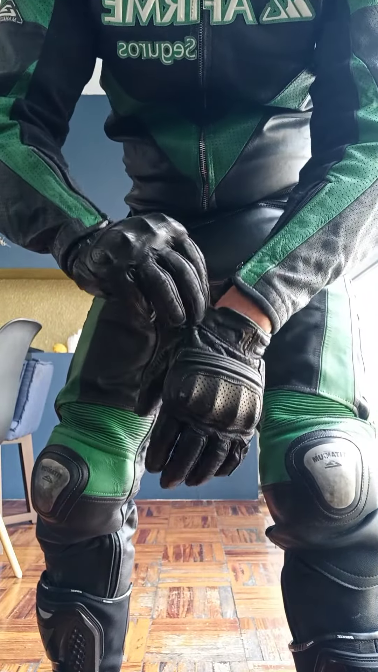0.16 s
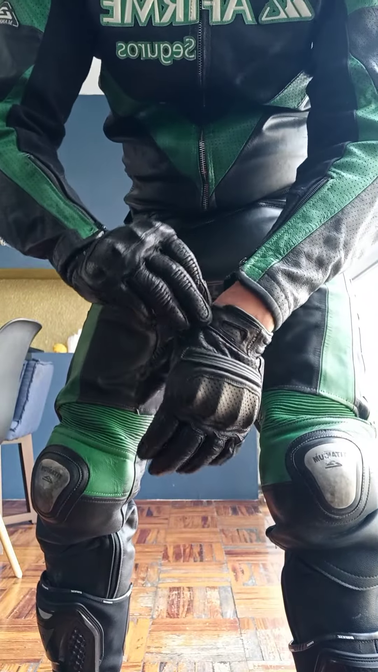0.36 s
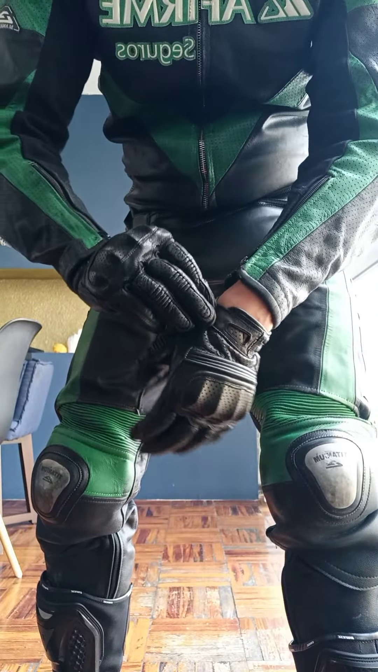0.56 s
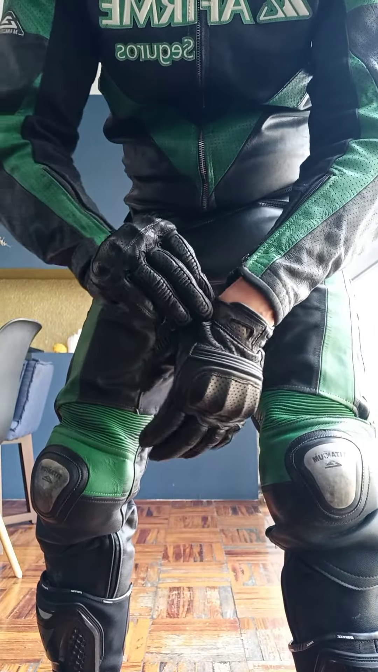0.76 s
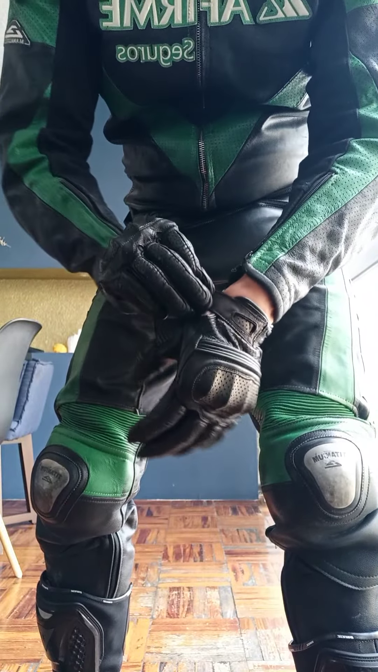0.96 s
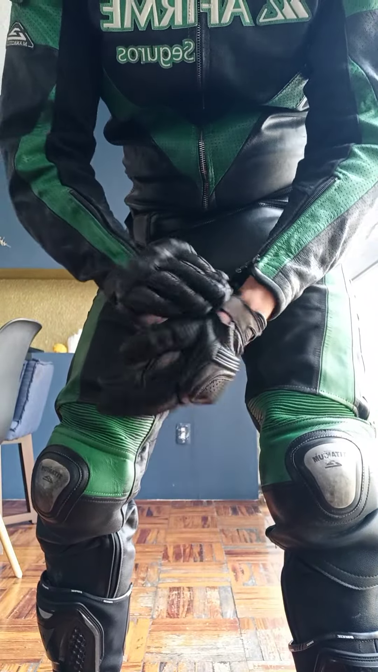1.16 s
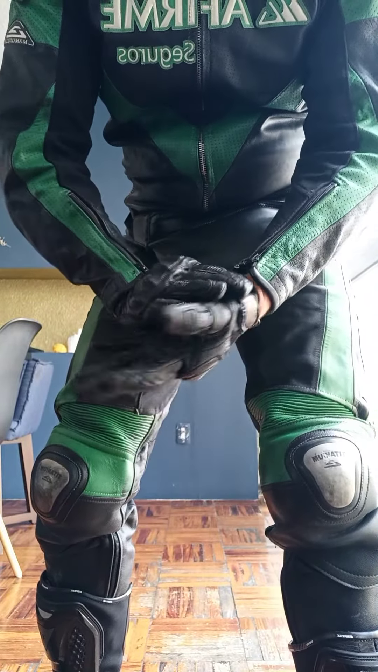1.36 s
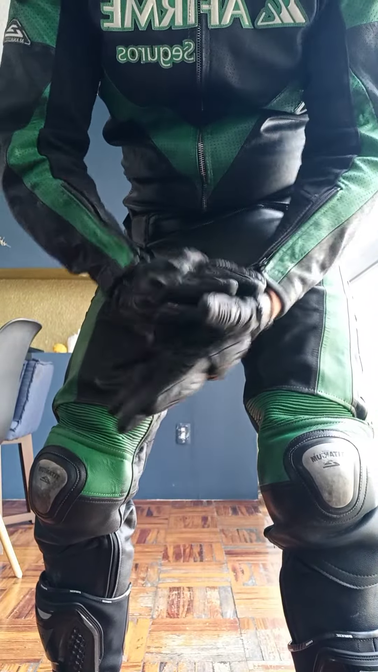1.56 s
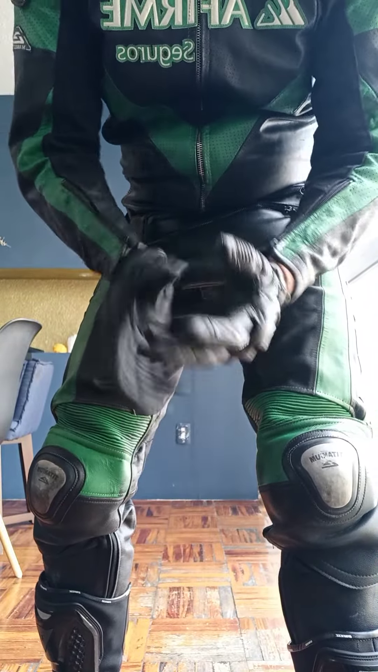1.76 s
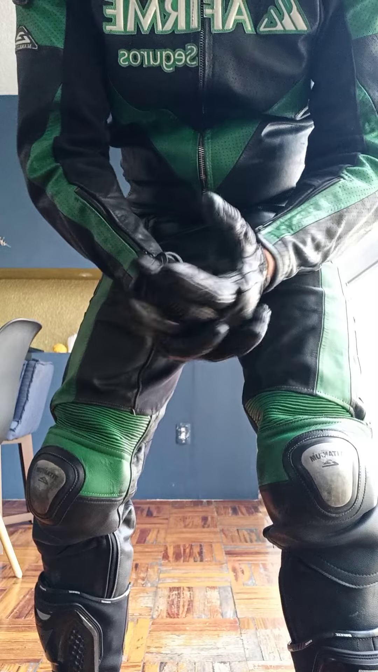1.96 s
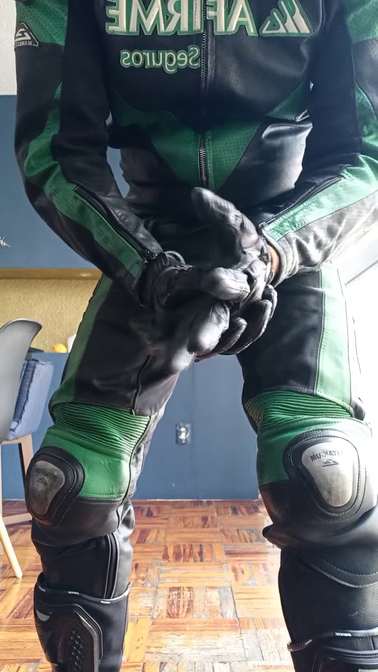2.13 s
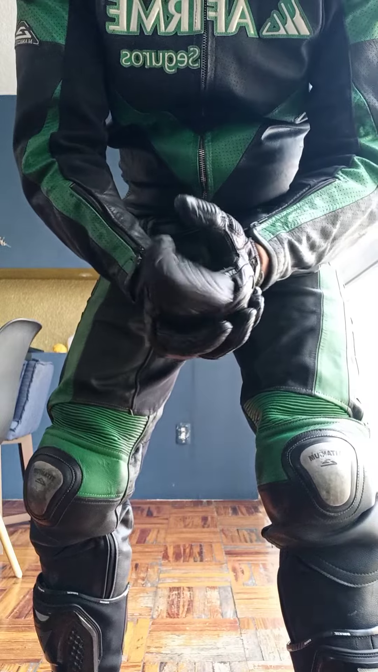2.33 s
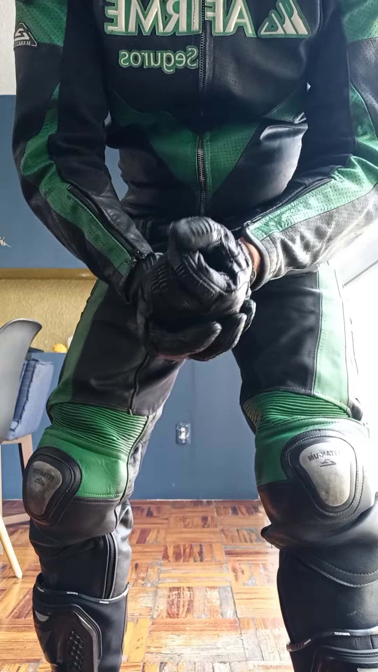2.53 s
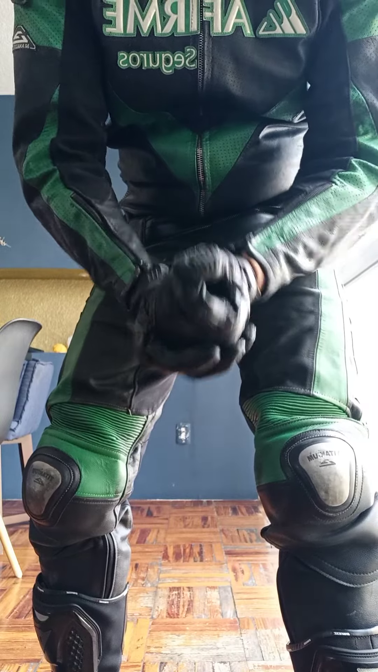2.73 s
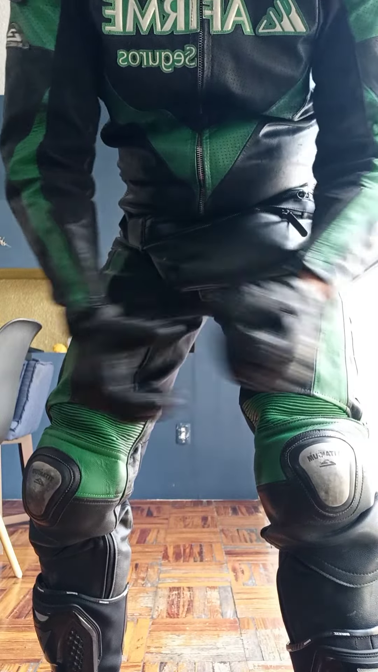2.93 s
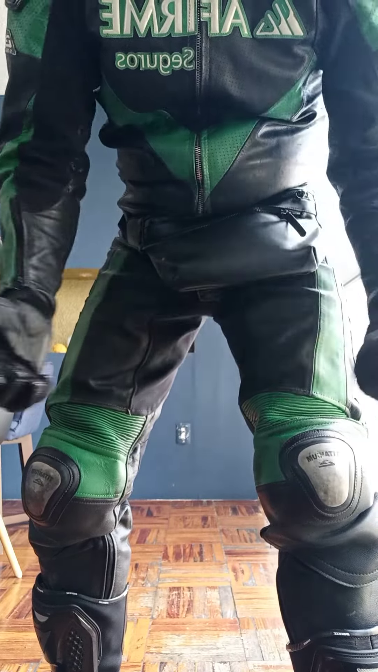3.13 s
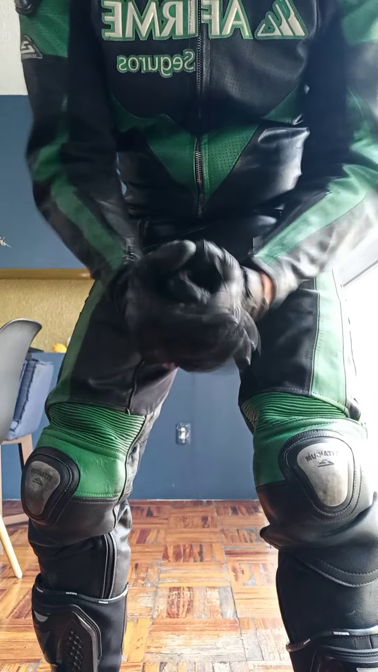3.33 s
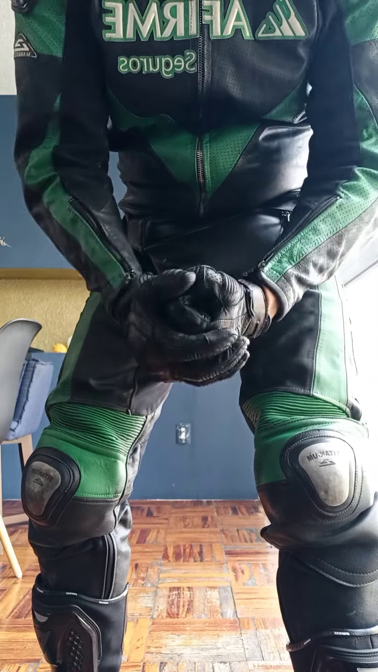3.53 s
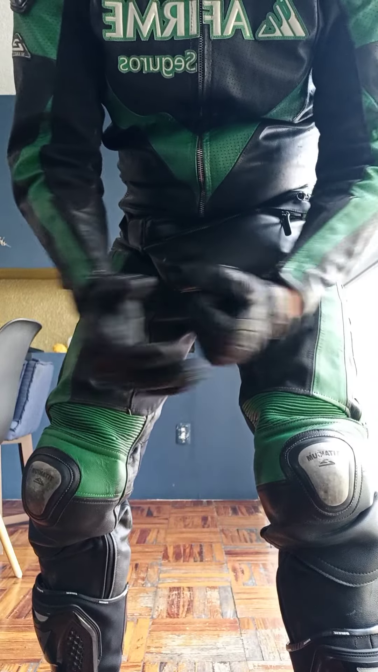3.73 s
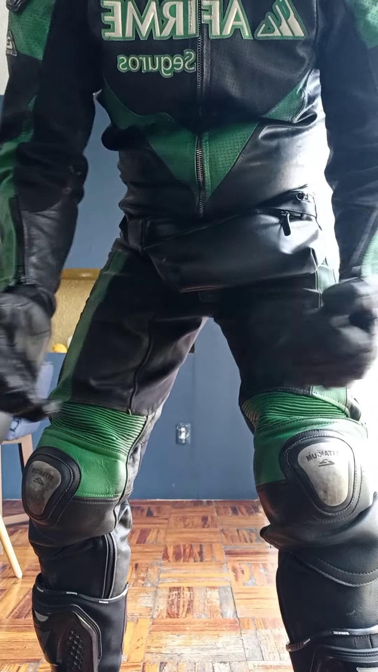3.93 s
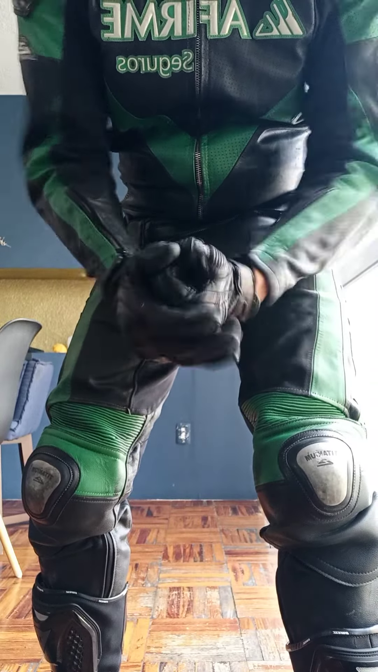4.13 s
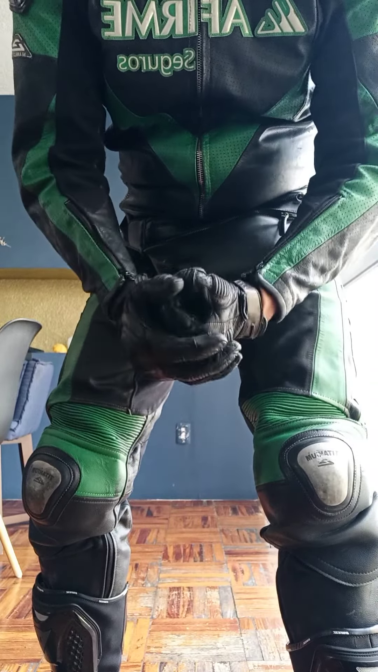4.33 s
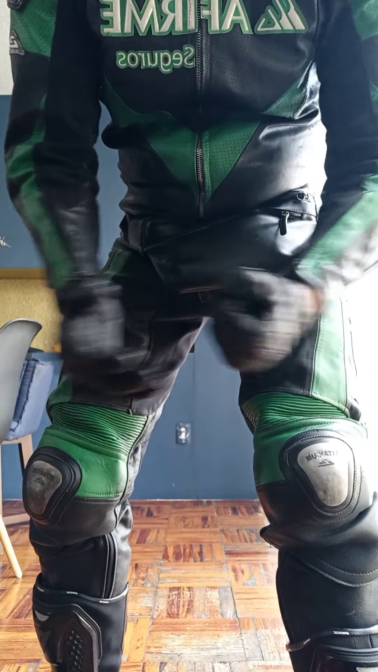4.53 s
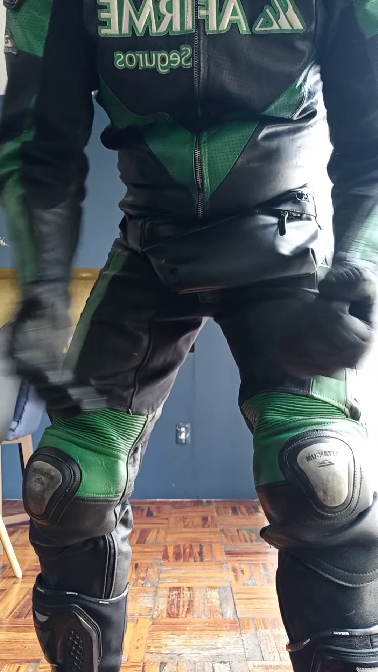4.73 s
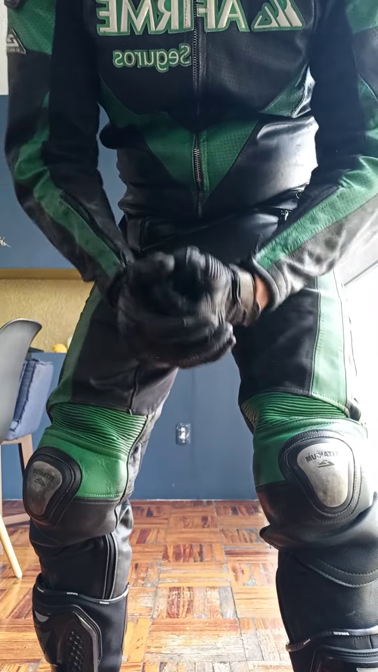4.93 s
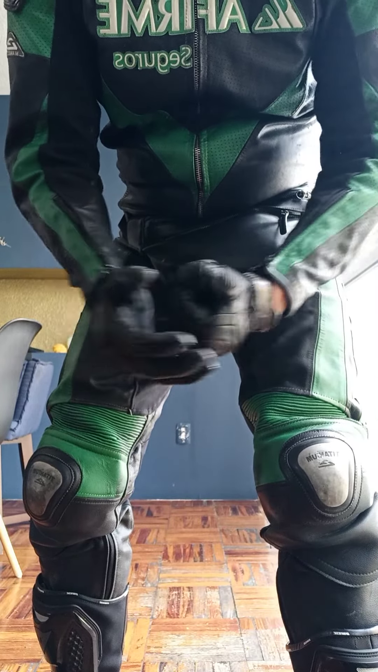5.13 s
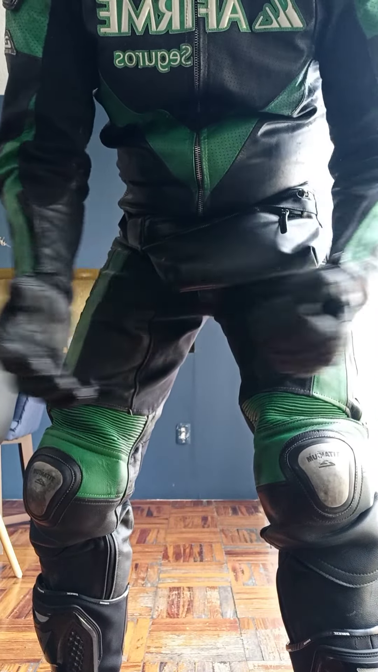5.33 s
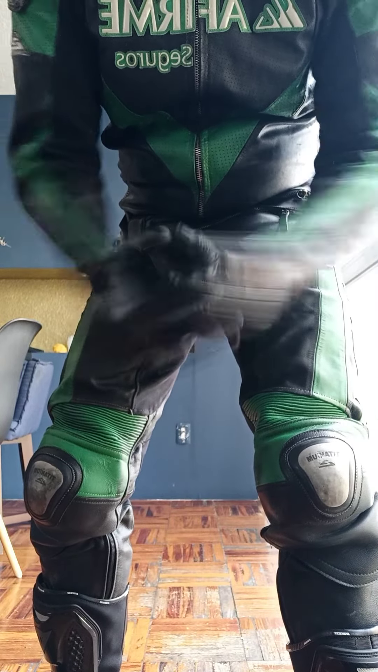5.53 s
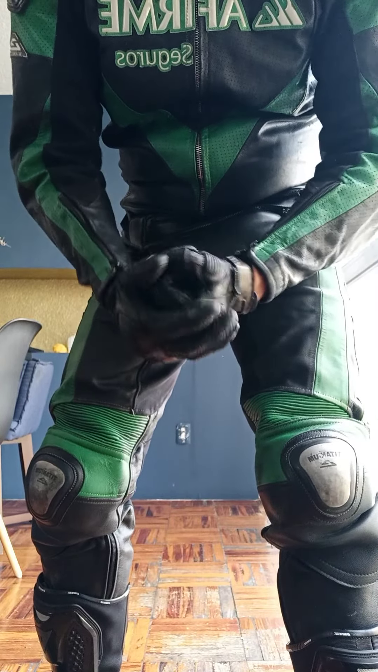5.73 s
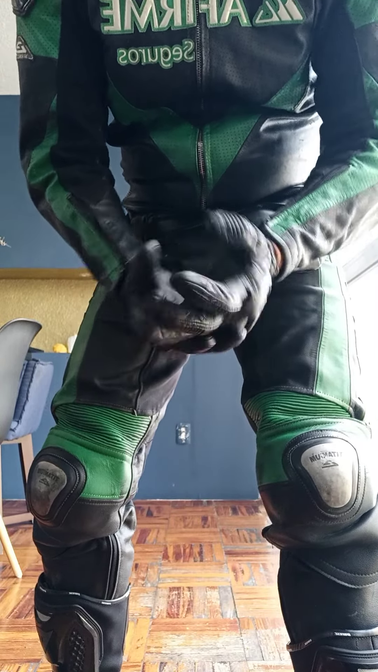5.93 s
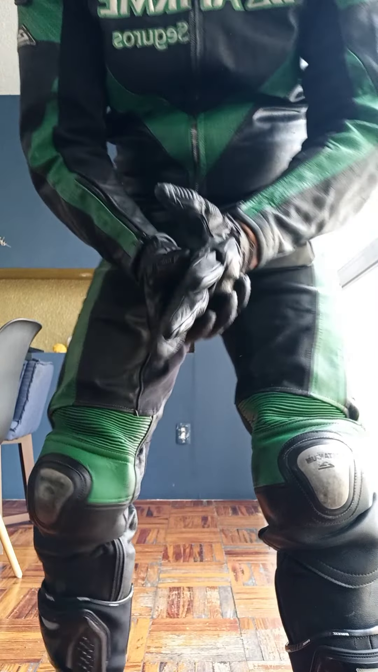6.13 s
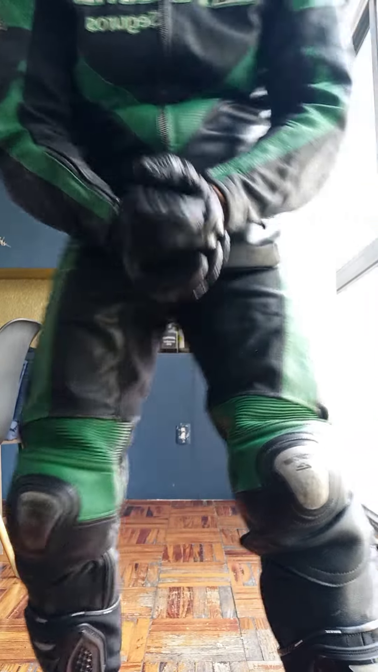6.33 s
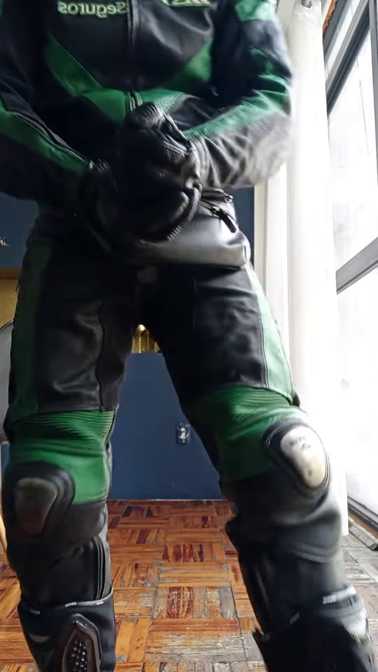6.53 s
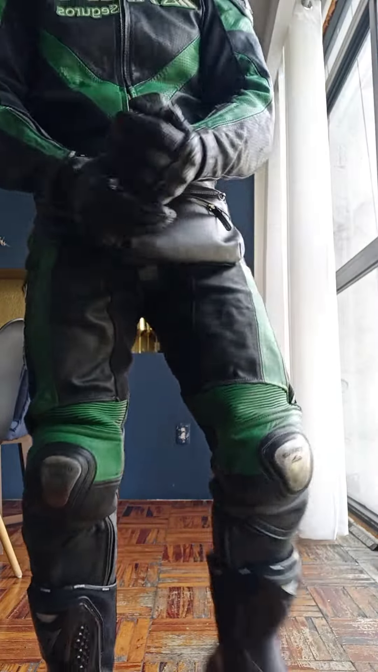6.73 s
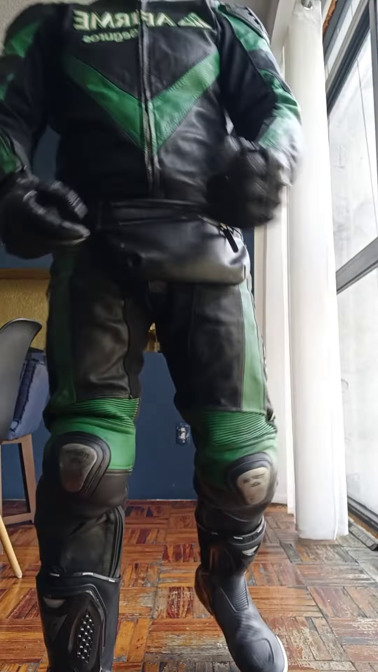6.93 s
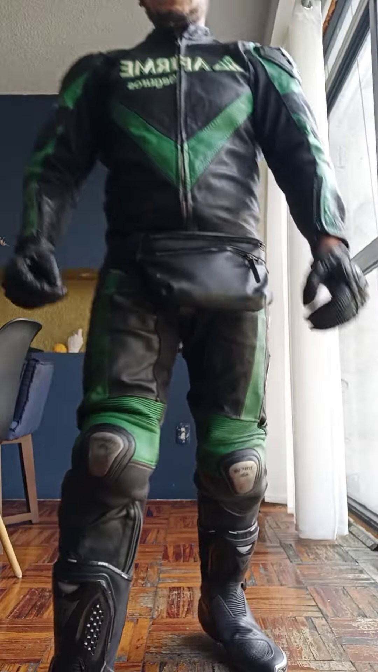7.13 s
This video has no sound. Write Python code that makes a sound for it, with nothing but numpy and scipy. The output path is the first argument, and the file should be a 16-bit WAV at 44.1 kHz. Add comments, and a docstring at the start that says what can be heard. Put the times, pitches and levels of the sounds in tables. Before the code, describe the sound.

Gloves creak and snap in small clicks, a fist slaps a gloved palm four evenly spaced times with short room echo, then heavy leather rustles and creaks.

```python
"""Tight leather creaks, rubs and ticks close by: someone in a riding suit tugs on armoured leather gloves.
Four times a fist smacks the other palm: slap noise and damped resonances, with a bare room ringing after.
Then the wearer straightens up and steps back, heard as creak, rub and a dull flutter of the suit.
Leather is stick-slip noise bursts, folds are decaying noise, the squeak is a ragged tone; soft bumps knock.
Behind lie steady room noise, low swelling tones of distant traffic and a faint wavering hum."""
import sys
import numpy as np
from scipy import signal
from scipy.fft import rfft, irfft, next_fast_len
from scipy.io import wavfile
from scipy.ndimage import uniform_filter1d, minimum_filter1d, map_coordinates

SR = 44100
rng = np.random.default_rng(int(sys.argv[2]) if len(sys.argv) > 2 else 0)


def output_pcm(signal):
    """Save a mono or channel-first signal as 16-bit PCM at the path in sys.argv[1].

    Samples are clipped to [-1, 1] before scaling.
    """
    pcm = np.clip(np.atleast_2d(signal).T, -1, 1) * 32767
    wavfile.write(sys.argv[1], SR, np.round(pcm).astype(np.int16))


N = 321048

# Spectrum levels are relative; squeak, bump, tug and traffic levels set the gain directly.
# Fist into palm, with five resonances of the air pocket and the leather over it:
# (time [s], level [dB], contact [s], room level [dB], boom level [dB], thud [Hz], level [dB],
#  hollow [Hz], level [dB], pop [Hz], level [dB], snap [Hz], level [dB], crack [Hz], level [dB])
PUNCHES = [(3.33, -4, 0.0053, -3, 0, 268, -10.5, 511, 1, 920, 0.5, 1450, -4.5, 2920, 3),
           (4.1104, 2, 0.00371, 1.5, 0.5, 263, -11, 610, -7, 897, -5, 1850, 5, 3430, -3),
           (4.8382, 2.5, 0.00263, 0, -2.5, 309, -2, 587, -16.5, 1185, -12, 1434, 2, 2630, 0.5),
           (5.5664, -4, 0.0045, -2.5, -7.5, 324, -5.5, 593, -5.5, 864, -1.5, 2250, 2.5, 3320, -7.5)]
# Loudest leather folds snapping over: (time [s], crack level [dB], body level [dB])
FOLD_SNAPS = [(0.2267, -21, -62), (0.2749, -23.5, -45), (0.3097, -24, -64), (0.324, -24, -56),
              (0.3352, -19, -49.5), (0.372, -22.5, -55), (0.574, -29.5, -45), (0.65, -33.5, -68),
              (0.6768, -33, -60), (1.0419, -28.5, -66), (1.3147, -32, -43.5), (1.467, -32, -40.5),
              (1.5958, -35, -43.5), (1.6323, -21, -34.5), (1.7695, -24, -37), (1.804, -35, -43.5),
              (1.876, -31, -42.5), (1.885, -30, -44.5), (1.9365, -28.5, -47.5), (2.1043, -30, -54),
              (2.4575, -31.5, -69), (2.8607, -21.5, -33), (2.8831, -24.5, -32), (3.2724, -25, -48),
              (3.4539, -28.5, -55), (6.478, -35, -51)]
# Soft bumps of boots and padding: (time [s], level [dB], pitch [Hz])
BUMPS = [(0.575, -38, 280), (6.268, -41.5, 573.6), (6.299, -34.5, 337), (6.365, -45, 840),
         (6.962, -32, 312), (6.985, -36, 349.6)]
# Tugs dragging tight leather over the hand:
# (start [s], end [s], level at start [dB], level at end [dB], dull scrape level re tug [dB])
TUGS = [(0.208, 0.31, -45.5, -53, -13), (0.309, 0.412, -49, -42, -11), (0.818, 0.838, -61, -64, 5),
        (0.906, 0.948, -49.5, -55, -10), (1.055, 1.09, -38.5, -44.5, -13),
        (1.092, 1.13, -45.5, -39.5, -4.5), (1.536, 1.636, -53, -51, 0), (2.719, 2.894, -51.5, -45.5, -3),
        (5.831, 5.933, -55, -47.5, -6)]
# Leather squeak sliding upward: (time [s], pitch [Hz], level [dB])
SQUEAK = [(6.53, 1800, -68), (6.6, 2200, -63), (6.66, 2600, -62.5), (6.71, 3050, -68), (6.74, 3200, -85)]
# Effort of the fingers working the glove on: (time [s], level [dB])
EFFORT = [(0.0, -61.5), (0.39, -71), (0.64, -68.5), (0.93, -64), (1.13, -55), (1.53, -60), (1.75, -59),
          (2.39, -68), (2.51, -77.5), (2.76, -82), (2.89, -63.5), (3.25, -66.5)]
# Swells of distant traffic: (middle [s], width [s], level [dB], pitch [Hz])
TRAFFIC_SWELLS = [(0.16, 0.07, -53.5, 67.6), (1.83, 0.23, -48, 69.1), (2.421, 0.083, -48, 82),
                  (3.35, 0.27, -42, 84.1), (4.24, 0.099, -41, 84.2), (4.78, 0.11, -43.5, 84.1),
                  (5.32, 0.097, -43, 67.2), (5.941, 0.084, -42.5, 67), (6.29, 0.097, -42.5, 68.5),
                  (6.9, 0.16, -53, 71.1)]

# Palm slap spectrum: (frequency [Hz], level per Hz [dB])
SLAP_SPECTRUM = [(40, -11), (110, -4.5), (170, -8), (300, -10), (700, -2.5), (1500, 2.5), (3000, -0.5),
                 (4200, -5.5), (5300, -11), (6500, 0), (7800, -3.5), (12000, -15), (15500, -5.5)]
# Leather creak spectrum: (frequency [Hz], level per Hz [dB])
CREAK_SPECTRUM = [(300, -35), (1500, -18), (3200, -26), (4500, -6), (5200, -13.5), (5900, -6), (6300, 5.5),
                  (7600, 3.5), (9000, -1), (12000, -4.5), (14500, 6), (16000, -4.5)]
# Duller knock around a fold: (frequency [Hz], level per Hz [dB])
FOLD_SPECTRUM = [(150, -14.5), (500, 1.5), (1000, -2.5), (2000, 8), (3200, 4), (4600, 2), (7000, -19),
                 (15000, 0)]
# Sliding leather spectrum: (frequency [Hz], level per Hz [dB])
RUB_SPECTRUM = [(200, -13.5), (600, -10), (950, 4.5), (1400, 4), (2100, 0.5), (3000, -1), (4400, -3),
                (5400, -10.5), (8000, -14), (15000, -21)]
# Heavy suit spectrum: (frequency [Hz], level per Hz [dB])
SUIT_SPECTRUM = [(60, -6), (150, 0.5), (260, 2), (400, -0.5), (600, -6.5), (900, -11), (2000, -33),
                 (6000, -49.5)]
# Dull scrape under a tug: (frequency [Hz], level per Hz [dB])
SCRAPE_SPECTRUM = [(200, -19), (700, -4), (1500, 0), (2500, -4.5), (4300, -2), (5300, -9), (7000, -3),
                   (15000, -30)]
# Steady room noise spectrum: (frequency [Hz], level per Hz [dB])
ROOM_NOISE_SPECTRUM = [(25, -34), (50, -40), (70, 6.5), (100, 2.5), (140, -2.5), (250, -11.5), (400, -18.5),
                       (600, -17.5), (1000, -20.5), (2000, -18), (4000, -51.5), (5200, -50.5), (7000, -30),
                       (15000, -33)]

# Broad colour of the echo: (frequency [Hz], level [dB])
ECHO_COLOUR = [(40, -23), (100, 0), (200, -5.5), (420, -4), (600, 3), (900, -6), (2000, -10), (4000, -5),
               (7000, -5.5), (15000, -5.5)]
# Echo decay: (frequency [Hz], t60 [s])
ECHO_T60 = [(100, 0.71), (400, 0.48), (1500, 0.57), (4000, 0.47), (7500, 0.44), (14000, 0.33)]
# Resonances standing out of the echo: (frequency [Hz], width [Hz], level before contrast [dB])
ECHO_RINGS = [(396, 64, -5), (1746, 71, -13), (2260, 100, -10.5), (2900, 21, -19), (3100, 40, -10),
              (3630, 90, -12), (4400, 89, -17.5), (4500, 230, -19.5)]
# Low room resonances colouring every sound: (frequency [Hz], width [Hz], level before contrast [dB])
ROOM_MODES = [(589, 61, 6), (932, 104, -7)]

# Correlation of the two microphone ports: (frequency [Hz], correlation [-1..1])
PORT_LIKENESS = [(70, 0.97), (170, 0.92), (340, 0.88), (560, 0.7), (900, 0.42), (1400, -0.2), (2200, 0.12),
                 (3500, 0), (15000, 0)]
# Balance of the direct punches: (frequency [Hz], left minus right [dB])
PUNCH_BALANCE = [(100, 4), (300, 4.5), (600, 2), (900, 3), (2000, 3), (4000, -6.5), (7000, -10), (8300, 2),
                 (12000, -5), (15000, -15.5)]
# Balance of echo and room noise: (frequency [Hz], left minus right [dB])
ROOM_BALANCE = [(100, 0.5), (380, 0), (700, -2.5), (1300, -1.5), (2400, -2), (4400, -5), (7000, -9),
                (8300, -0.5), (12000, -5.5), (15000, -14)]
# Balance of the leather noise: (frequency [Hz], left minus right [dB])
LEATHER_BALANCE = [(100, 2.5), (400, 0.5), (700, -5.5), (1300, -0.5), (2400, -3), (4400, -6), (5100, -6.5),
                   (6800, -12), (8300, -0.5), (12000, -6.5), (15000, -11.5)]
# Treble notch of the phone: (frequency [Hz], gain [dB])
PHONE_NOTCH = [(7700, 0), (8500, -10.5), (8850, -29), (9900, -32), (11000, -36.5), (11350, -33.5),
               (11650, -4), (15350, -7.5), (15800, -25.5), (16500, -35.5)]

TOP_HZ = 16600
# arms swing in just before each punch, part after it
SWING_LEAD_S, SWING_WIDTH_S, PART_AFTER_S, PART_WIDTH_S = 0.021, 0.0717, 0.29, 0.09
# wearer rises with one heave, then keeps walking back
RISE_AT_S, RISE_S, HEAVE_AT_S, HEAVE_WIDTH_S = 6.06, 0.15, 6.33, 0.15


def amp(db):
    """Decibels to gain."""
    return 10 ** (np.asarray(db) / 20)


def unit(x):
    """Scale to rms 1."""
    return x / np.sqrt(np.mean(x ** 2) + 1e-20)


def along(points, hz):
    """(Hz, value) points interpolated on a log frequency axis."""
    point_hz, values = np.transpose(points)
    return np.interp(np.log(hz + 1), np.log(point_hz + 1), values)


def curves(rows):
    """One value per sample for each column after the time."""
    time_s, *columns = np.transpose(rows)
    return [np.interp(np.arange(N) / SR, time_s, column) for column in columns]


def wobble(knots_per_s):
    """Smooth random curve through normal-distributed knots."""
    knots = rng.standard_normal(int(N * knots_per_s / SR) + 4)
    return map_coordinates(knots, [np.arange(N) * knots_per_s / SR])


def hump(at_s, width_s):
    """Gaussian rise and fall of height 1."""
    return np.exp(-.5 * ((np.arange(N) / SR - at_s) / width_s) ** 2)


def filtered(x, response):
    """Multiply the spectrum of x by a response of frequency."""
    n = x.shape[-1]
    padded = next_fast_len(n + 8192)
    spectrum = rfft(x, padded) * response(np.fft.rfftfreq(padded, 1 / SR))
    return irfft(spectrum, padded)[..., :n]


def coloured(x, spectrum, size=2048):
    """Minimum-phase colouring: nothing sounds before a blow."""
    cepstrum = irfft(np.log(amp(along(spectrum, np.fft.rfftfreq(size, 1 / SR)))))
    cepstrum[1:size // 2] *= 2
    cepstrum[size // 2 + 1:] = 0
    kernel = irfft(np.exp(rfft(cepstrum)))
    kernel = kernel[None] / np.linalg.norm(kernel)
    return signal.fftconvolve(x, kernel, axes=1)[:, :x.shape[1]]


def lean(pair, balance):
    """Tilt the level between left and right."""
    return filtered(pair, lambda hz: amp(np.outer([.5, -.5], along(balance, hz))))


def ports(pair, balance):
    """Unrelated signals as two ports hear them: alike in the bass, apart and lopsided in the treble."""
    def common_and_opposed(hz):
        angle = np.arccos(np.clip(along(PORT_LIKENESS, hz), -1, 1)) / 2
        return np.array([np.cos(angle), np.sin(angle)])
    common, opposed = filtered(pair, common_and_opposed)
    return lean(np.array([common + opposed, common - opposed]), balance)


def add(track, at_s, sound):
    """Mix a sound into the track in place."""
    part = track[:, max(round(at_s * SR), 0):][:, :sound.shape[-1]]
    part += sound[..., :part.shape[1]]


def ring(t, hz, t60_s):
    """One damped resonance, silent before t = 0."""
    t = np.maximum(t, 0)
    return np.sin(2 * np.pi * hz * t) * amp(-60 * t / t60_s)


def resonances(hz, rows, gain_db, contrast):
    """Band-pass peaks on a flat response; contrast is the share of their level difference kept."""
    response = 1
    for at_hz, width_hz, db in rows:
        damping = 1j * hz * width_hz
        response = response + amp(gain_db + contrast * db) * damping / (at_hz ** 2 - hz ** 2 + damping)
    return response


def slips(spectrum, rate_per_s, spread_db, life_s, smooth_db):
    """Stick-slip of leather, rms 1: tiny bursts of uneven size over a smooth sliding hiss."""
    sizes_db = spread_db * np.minimum(rng.exponential(size=N), 3)
    sizes = (rng.random(N) < rate_per_s / SR) * amp(sizes_db)
    power = signal.lfilter([1], [1, -np.exp(-2 / (life_s * SR))], sizes ** 2)
    envelope = np.sqrt(power / power.mean() + amp(smooth_db) ** 2)
    grains = envelope * rng.standard_normal((2, N))
    return unit(ports(coloured(grains, spectrum), LEATHER_BALANCE))


def punches():
    """Fingers brush in, leather slaps while the fist lands, and the air pocket of the palm rings."""
    slap_db, pocket_db, bass_cut_hz = -9, -4, 70
    brush_db, brush_s, release_t60_s, pad_share = -24, 0.005, 0.019, 0.97
    thud_t60_s, pop_t60_s, snap_t60_s, crack_t60_s = 0.038, 0.027, 0.013, 0.0081
    wet_db, slap_wet_db, pocket_wet_db = 1, 14, -10
    boom_db, boom_hz, boom_t60_s = -6, 410, 0.015
    lead_s = .02
    out, t = np.zeros((2, N)), np.arange(SR) / SR - lead_s
    # the room is fed from all sides of the hands: it takes the slap's smooth overall colour
    radiated = coloured(signal.unit_impulse(SR, round(lead_s * SR))[None], SLAP_SPECTRUM)
    for at_s, db, contact_s, room_db, low_db, *pocket_rings in PUNCHES:
        (thud_hz, thud_db, hollow_hz, hollow_db, pop_hz, pop_db,
         snap_hz, snap_db, crack_hz, crack_db) = pocket_rings
        brush = amp(brush_db) * np.exp(-np.abs(t) / brush_s)
        release = amp(-60 * np.maximum(t - contact_s, 0) / release_t60_s)
        press = np.where(t < 0, brush, release)
        skin, pads = press * rng.standard_normal((2, len(t)))
        slap = coloured(np.array([skin + pad_share * pads, skin - pad_share * pads]), SLAP_SPECTRUM)
        # thud and crack start at first touch, the rest as the pocket closes
        pocket = (amp(thud_db) * ring(t, thud_hz, thud_t60_s)
                  + amp(crack_db) * ring(t, crack_hz, crack_t60_s)
                  + amp(hollow_db) * ring(t - contact_s / 4, hollow_hz, pop_t60_s)
                  + amp(snap_db) * ring(t - contact_s / 4, snap_hz, snap_t60_s)
                  + amp(pop_db) * ring(t - contact_s / 2, pop_hz, pop_t60_s))
        direct = lean(amp(slap_db) * slap + amp(pocket_db) * pocket, PUNCH_BALANCE)
        # high-pass: keeps deep bass and offset out of the direct slap
        direct = filtered(direct, lambda hz: 1j * hz / (1j * hz + bass_cut_hz))
        boom = amp(boom_db + low_db) * ring(t, boom_hz, boom_t60_s)
        echo = room(amp(slap_wet_db) * radiated) + room((amp(pocket_wet_db) * pocket + boom)[None])
        add(out, at_s - lead_s, amp(db) * direct + amp(wet_db + room_db) * echo)
    return out


def tugs(relax_t60_s=0.07, smooth_samples=200):
    """Leather lets go abruptly, chatters in a dense run of slips, and relaxes when the pull stops."""
    t = np.arange(N) / SR
    chatter = slips(CREAK_SPECTRUM, rate_per_s=600, spread_db=3.5, life_s=.001, smooth_db=-3)
    scrape = slips(SCRAPE_SPECTRUM, rate_per_s=400, spread_db=3, life_s=.0015, smooth_db=-2)
    bright, dull = np.zeros(N), np.zeros(N)
    for start_s, end_s, first_db, last_db, scrape_db in TUGS:
        on = (t > start_s) & (t < end_s + relax_t60_s)
        relax_db = -60 * np.maximum(t[on] - end_s, 0) / relax_t60_s
        pull = amp(relax_db + np.interp(t[on], [start_s, end_s], [first_db, last_db]))
        bright[on] += pull
        dull[on] += amp(scrape_db) * pull
    return uniform_filter1d(bright, smooth_samples) * chatter + uniform_filter1d(dull, smooth_samples) * scrape


def fold_snaps():
    """A fold snaps over and settles: a bright crack and a duller knock of the leather around it."""
    crack_db, body_db, delay_s = -4, 9, 0.0011
    snap_t60_s, settle_db, settle_t60_s = 0.0044, -11, 0.051
    cracks, knocks, t = np.zeros((2, N)), np.zeros((2, N)), np.arange(SR // 20) / SR
    fade = amp(-60 * t / snap_t60_s) + amp(settle_db - 60 * t / settle_t60_s)
    for at_s, peak_db, fold_db in FOLD_SNAPS + small_folds():
        crack, knock = fade * rng.standard_normal((2, 2, len(t)))
        add(cracks, at_s + delay_s, amp(peak_db + crack_db) * crack)
        add(knocks, at_s + delay_s, amp(fold_db + body_db) * knock)
    return ports(coloured(cracks, CREAK_SPECTRUM) + coloured(knocks, FOLD_SPECTRUM), LEATHER_BALANCE)


def small_folds(count=24, gap_s=0.017):
    """Lesser folds give way at random, following the effort, and in quick runs during a tug."""
    over_effort_db, over_tug_db, body_db, scatter_db = 24, 13, -17, 3
    effort_s, effort_db = np.transpose(EFFORT)
    at_s = effort_s[-1] * (np.arange(count) + rng.random(count)) / count
    folds = list(zip(at_s, np.interp(at_s, effort_s, effort_db) + over_effort_db))
    for start_s, end_s, first_db, last_db, _ in TUGS:
        at_s = np.arange(start_s, end_s - gap_s, gap_s)
        at_s = at_s + gap_s * rng.random(count)[:len(at_s)]
        folds += zip(at_s, np.interp(at_s, [start_s, end_s], [first_db, last_db]) + over_tug_db)
    return [(s, db + scatter_db * rng.uniform(-0.89, 1), db + body_db) for s, db in folds]


def rustle(uneven_db=2.0):
    """Tight leather creaks, sliding leather rubs, and the heavy suit shifts with a dull flutter."""
    creak_gain, rub_gain, suit_gain = np.sqrt(fitting() ** 2 + swings() ** 2 + rising() ** 2)
    grip_db = uneven_db * wobble(22)  # fingers catch and let go
    creak = slips(CREAK_SPECTRUM, rate_per_s=130, spread_db=-2, life_s=.0015, smooth_db=10.5)
    rub = slips(RUB_SPECTRUM, rate_per_s=130, spread_db=6.5, life_s=0.00463, smooth_db=6.0)
    suit = slips(SUIT_SPECTRUM, rate_per_s=55, spread_db=2.5, life_s=0.016, smooth_db=8)
    return creak_gain * amp(grip_db) * creak + rub_gain * amp(grip_db / 2) * rub + suit_gain * suit


def fitting(creak_db=5, rub_db=-58.5, rub_follows=0.21, suit_db=-55, suit_follows=0.12):
    """Creak, rub, suit gains until the first punch: effort drives creak, the others follow a little."""
    effort_db, = curves(EFFORT)
    extra_db = effort_db - np.mean(EFFORT, axis=0)[1]
    levels_db = [effort_db + creak_db, rub_db + rub_follows * extra_db, suit_db + suit_follows * extra_db]
    return amp(levels_db) * (np.arange(N) / SR < PUNCHES[0][0])


def swings(rest_db=(-67, -63.5, -57.5), swing_db=(-61, -60, -62), part_db=(-61, -56, -52)):
    """Creak, rub, suit gains as arms close for each punch and part after it, over a resting level."""
    power = np.outer(amp(rest_db) ** 2, np.arange(N) / SR >= PUNCHES[0][0])
    for at_s, *_ in PUNCHES:
        power += np.outer(amp(swing_db), hump(at_s - SWING_LEAD_S, SWING_WIDTH_S)) ** 2
        power += np.outer(amp(part_db), hump(at_s + PART_AFTER_S, PART_WIDTH_S)) ** 2
    return np.sqrt(power)


def rising(walk_db=(-50.5, -53, -56), heave_db=(-56, -50, -53)):
    """Creak, rub, suit gains as the whole suit unfolds and stays in motion."""
    moving = np.clip((np.arange(N) / SR - RISE_AT_S) / RISE_S, 0, 1)
    heave = hump(HEAVE_AT_S, HEAVE_WIDTH_S)
    return np.hypot(np.outer(amp(walk_db), moving), np.outer(amp(heave_db), heave))


def squeak():
    """Leather sticks and slips fast enough to give a faint, ragged, broken pitch."""
    hz, db = curves(SQUEAK)
    t = np.arange(N) / SR
    sliding = (t > SQUEAK[0][0]) & (t < SQUEAK[-1][0])
    ragged, broken = 1 + .026 * wobble(600), amp(3.5 * wobble(110))
    tone = np.sin(2 * np.pi * np.cumsum(hz * ragged) / SR)
    return sliding * amp(db) * unit(broken * tone)


def bumps(t60_s=0.04, scuff_db=-9):
    """Soft contacts: a short low knock with a scuff."""
    out, t = np.zeros((2, N)), np.arange(SR // 4) / SR
    for at_s, db, hz in BUMPS:
        scuff = coloured(amp(scuff_db - 60 * t / t60_s) * rng.standard_normal((1, len(t))), SUIT_SPECTRUM)
        add(out, at_s, amp(db) * (ring(t, hz, t60_s) + scuff))
    return out


def room(x, build_s=0.0038, uneven_db=2.0):
    """Uneven reflections thicken over the first moments, then each frequency dies at its own speed."""
    arrivals = rng.standard_normal((2, SR)) * amp(uneven_db * wobble(300.3)[:SR])
    hz, t, bins = signal.stft(arrivals, SR, nperseg=256)
    decay = amp(-60 * t / along(ECHO_T60, hz)[:, None])
    tail = signal.istft(bins * decay * (1 - np.exp(-t / build_s)), SR, nperseg=256)[1]
    tail = filtered(ports(tail / np.linalg.norm(tail[0]), ROOM_BALANCE), echo_response)
    return signal.fftconvolve(x.mean(axis=0)[None], tail, axes=1)[:, :x.shape[1]]


def echo_response(hz):
    """The echo's broad colour, with the room's rings standing out of it."""
    return amp(along(ECHO_COLOUR, hz) - 1.5) * resonances(hz, ECHO_RINGS, gain_db=-1.5, contrast=0.08)


def wavering_tone(hz, waver):
    """Sine of rms 1 whose pitch drifts at random."""
    return unit(np.sin(2 * np.pi * np.cumsum(hz * (1 + waver * wobble(6.3))) / SR))


def background(noise_db=-51.0, hum_hz=125, hum_db=-61):
    """Steady room noise, swells of distant traffic, and a faint wavering hum above them."""
    traffic = sum(amp(db) * hump(at_s, width_s) * wavering_tone(hz, waver=0.014)
                  for at_s, width_s, db, hz in TRAFFIC_SWELLS)
    hum = amp(2.5 * wobble(4)) * wavering_tone(hum_hz, waver=0.04)
    noise = unit(ports(coloured(rng.standard_normal((2, N)), ROOM_NOISE_SPECTRUM), ROOM_BALANCE))
    return traffic + amp(hum_db) * hum + amp(noise_db) * noise


def scene(leather_wet_db=-4):
    """All the sources in the room."""
    leather, soft = fold_snaps() + tugs(), bumps()
    near = punches() + rustle() + squeak() + leather + soft
    mix = near + amp(leather_wet_db) * room(leather) + room(soft) + background()
    return filtered(mix, lambda hz: resonances(hz, ROOM_MODES, gain_db=-7, contrast=0.1))


def limiter(x, ceiling, recovery_db_per_s=90, size=64):
    """Turns peaks down just ahead of time, then recovers at a steady rate in dB."""
    over_db = 20 * np.log10(np.maximum(np.abs(x).max(axis=0) / ceiling, 1))
    ramp_db = recovery_db_per_s * np.arange(N) / SR
    cut_db = np.maximum.accumulate(over_db + ramp_db) - ramp_db
    return x * uniform_filter1d(minimum_filter1d(amp(-cut_db), 2 * size), size)


def record(dry):
    """The phone has a deep notch in the treble, limits peaks and keeps nothing above its band."""
    heard = filtered(dry, lambda hz: amp(along(PHONE_NOTCH, hz)))
    held = limiter(heard, ceiling=.9)
    return filtered(held, lambda hz: hz < TOP_HZ)


dry = scene()
out = record(dry)
output_pcm(out)
```